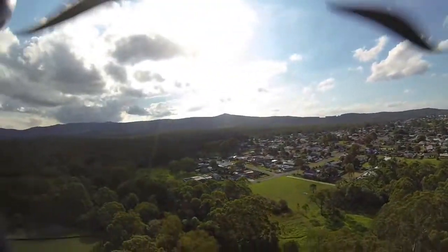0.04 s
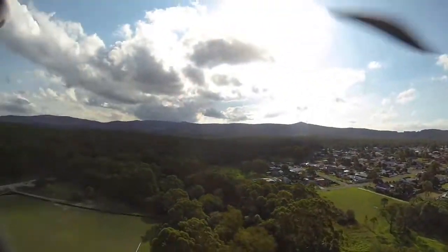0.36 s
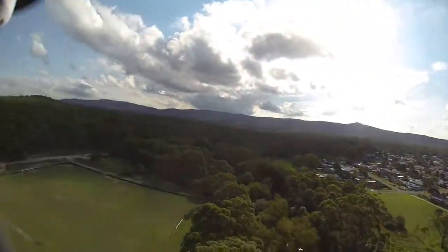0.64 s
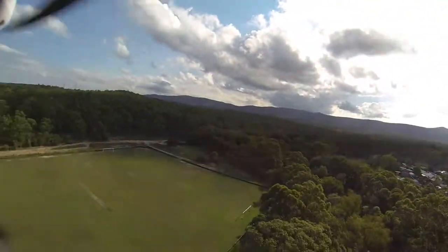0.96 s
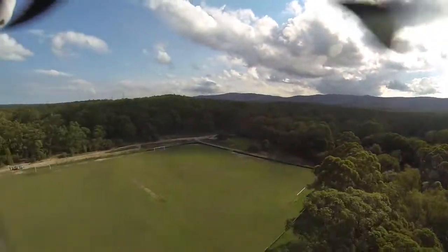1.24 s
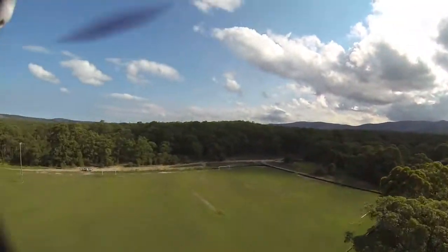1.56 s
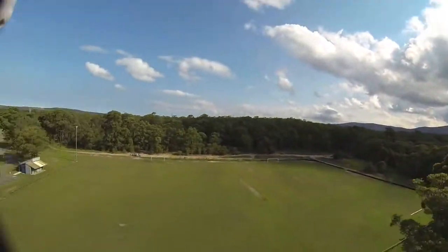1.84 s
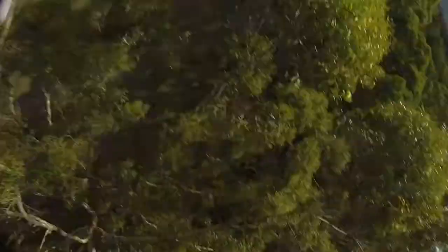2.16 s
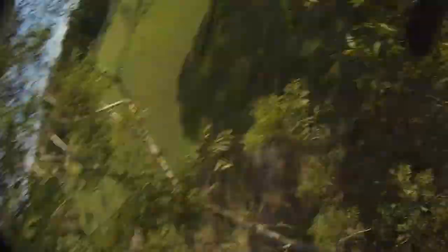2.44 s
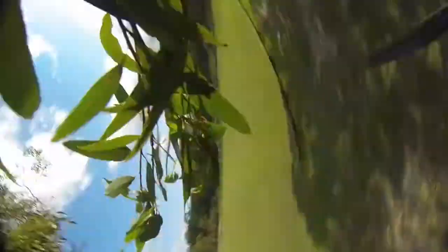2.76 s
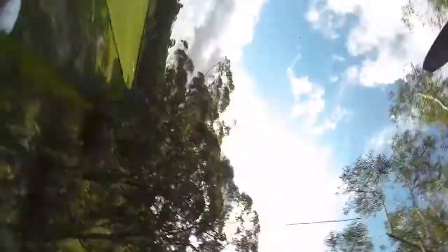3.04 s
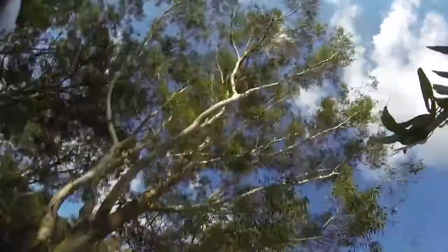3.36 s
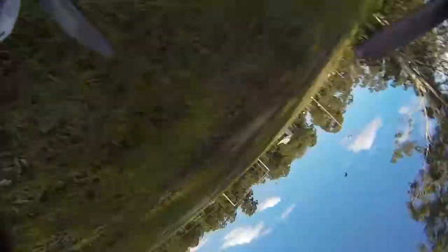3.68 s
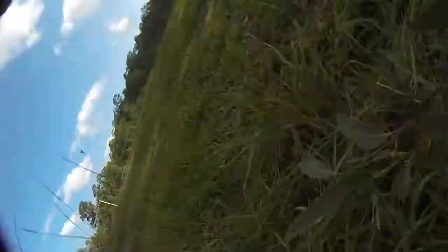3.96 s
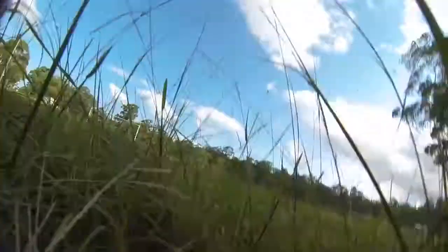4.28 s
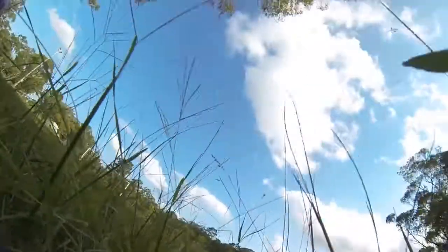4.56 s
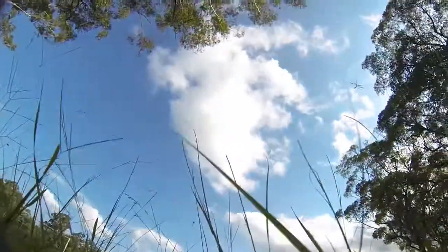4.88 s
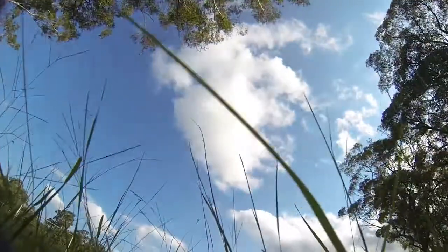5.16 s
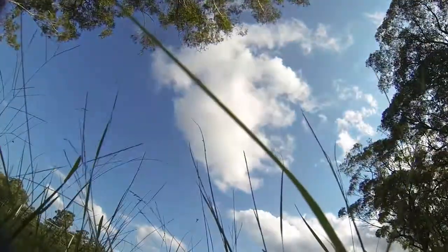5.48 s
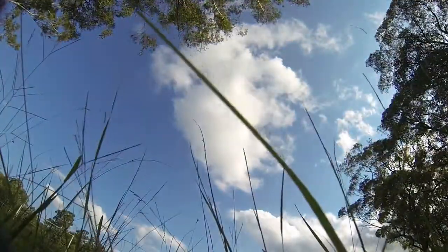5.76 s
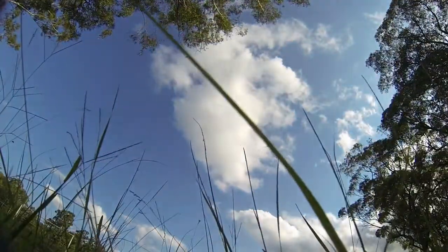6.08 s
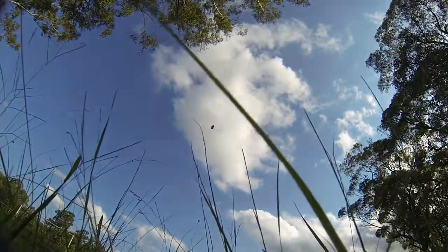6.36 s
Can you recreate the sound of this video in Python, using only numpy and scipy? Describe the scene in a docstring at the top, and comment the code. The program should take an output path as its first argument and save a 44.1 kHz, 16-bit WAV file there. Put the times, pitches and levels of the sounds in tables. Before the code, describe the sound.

A small drone flies outdoors, heard from its own microphone. The propellers buzz in four rising bursts, with a brief motor whine between them and wind buffeting throughout. The blades then stall in a tree, and the drone tumbles through rustling leaves and snapping twigs with dull thumps and gusts. It lands in long grass, which swishes and ticks as it settles over a faint low hum.

```python
"""A tree top over long grass, heard from a camera on a quadcopter. Four bursts of throttle: the blades
slap the microphone with pressure pulses, and the motors whine as they brake in between. The blades stall
in the tree; the drone tumbles through leaves, twigs and rushing air and lands in the grass, where stalks
settle and tick. Gusts and blows make the camera's gain control duck."""
import sys
import numpy as np
from scipy import signal
from scipy.fft import rfft, irfft, next_fast_len
from scipy.io import wavfile
from scipy.ndimage import uniform_filter1d, map_coordinates

SR = 44100
rng = np.random.default_rng(int(sys.argv[2]) if len(sys.argv) > 2 else 0)


def file_out(sig):
    """Save sig as 16-bit WAV at sys.argv[1]."""
    # one column per channel
    cols = np.atleast_2d(sig).T
    # limit, then scale
    lim = np.clip(cols, -1, 1)
    pcm = np.round(lim * 32767).astype(np.int16)
    wavfile.write(sys.argv[1], SR, pcm)


N = 287532
TIME_S = np.arange(N) / SR


# throttle bursts: open t/s, cut t/s, starting blade rate/Hz, target blade rate/Hz, spin-up tau/s,
# slap level/dB, hiss level/dB, trim of the braking sound before the burst/dB
BURSTS = [(0.026, 0.519, 94.25, 180.6, 0.12, -19.5, -30.5, 6),
          (0.601, 1.025, 103.2, 185.4, 0.15, -19, -28.5, 6.5),
          (1.194, 1.696, 96.36, 179, .095, -19.5, -31, 0),
          (1.805, 2.022, 112.9, 223.1, 0.26, -20, -30.5, 1)]

def throttle(braking_s=0.016, run_down_s=0.23):
    """Blades spin up, brake between bursts, then run down; returns blade rate, braking 0-1, gains."""
    t = TIME_S
    blade_hz, driven = np.zeros(N), np.zeros(N, bool)
    last_cut, last_hz = 0, BURSTS[0][2]
    for start, cut, from_hz, target_hz, spin_up_s, *_ in BURSTS:
        off, on = (t >= last_cut) & (t < start), (t >= start) & (t < cut)
        blade_hz[off] = from_hz + (last_hz - from_hz) * np.exp((last_cut - t[off]) / braking_s)
        blade_hz[on] = target_hz - (target_hz - from_hz) * np.exp((start - t[on]) / spin_up_s)
        driven |= on
        last_cut, last_hz = cut, blade_hz[on][-1]
    blade_hz[t >= last_cut] = last_hz * np.exp((last_cut - t[t >= last_cut]) / run_down_s)
    brake = uniform_filter1d(1.0 * (~driven & (t < last_cut)), size=600)
    burst_index = np.searchsorted([row[1] for row in BURSTS[:-1]], t)
    return blade_hz, brake, amp(np.array(BURSTS)[burst_index, -3:].T)


# blade slap and slipstream spectra: f/Hz, relative level/dB
SLAP_SPECTRUM = [(60, 19), (170, 6.5), (360, 6.5), (540, 2.4), (720, -5), (920, -12), (1400, -11.5),
                 (1750, -14.5), (2400, -23), (5000, -41)]
HISS_SPECTRUM = [(600, -24), (2200, 6.5), (5000, 1), (9000, -2), (13500, -1.5), (16000, -6.5)]

def propellers(blade_hz, brake, slap_gain, hiss_gain):
    """Each passing blade throws a pressure pulse; returns the sound and the wash's gain on the eddies."""
    far_ratio, far_db = 0.94, -11  # second, more distant rotor
    edge_hz, stall_s = 280, (1.96, 2.0)
    speed = blade_hz / blade_hz.max()
    jitter = (0.002 + 0.04 * brake) * wobble(70)
    cycles = np.cumsum(blade_hz * (1 + jitter)) / SR
    near = np.diff(np.floor(cycles), prepend=0) * amp(1.1 * wobble(170))
    far = np.diff(np.floor(far_ratio * cycles + 0.291 * wobble(6)), prepend=0)
    pulses = colour(near + amp(far_db) * far, SLAP_SPECTRUM)
    pulses = unit(pulses - uniform_filter1d(pulses, size=1500))
    # slow blade: soft push; fast blade: sharp edge
    push = signal.lfilter(*signal.butter(1, edge_hz, fs=SR), pulses)
    edge = pulses - push
    # stall in the leaves: the slap gives way to a falling throb
    running = np.interp(TIME_S, stall_s, [1, 0])
    slap = running * slap_gain * amp(-1.5 * brake) * (speed ** 0.46 * push + speed ** 1.72 * edge)
    throb = swell(peak_s=2.105, rise_s=0.055, fall_s=0.065, db=-16.5) * np.sin(2 * np.pi * cycles)
    # air is roughest just behind each blade
    beat = 0.49 + np.exp(-(cycles % 1) / 0.14)
    beat /= np.sqrt(np.average(beat ** 2, weights=running))
    slipstream = running * hiss_gain * speed ** 3.7 * noise(HISS_SPECTRUM) * beat
    wash = amp(6 - 3.5 * brake) * speed ** 0.18 * beat
    return slap + throb + slipstream, 1 + running * (wash - 1)


# motor whine: harmonic number, relative level/dB
WHINE_HARMONICS = [(1, -10), (2, -17), (3, -16), (5, -23), (7, -15.5), (9, -15)]

def motor_braking(effort, whine_hz=1147):
    """Braking motors sizzle and whine at one slightly rough pitch."""
    phase = 2 * np.pi * np.cumsum(whine_hz * (1 + 0.016 * wobble(600))) / SR
    whine = sum(amp(db) * np.sin(k * phase) for k, db in WHINE_HARMONICS) * amp(1.5 * wobble(120))
    sizzle = uniform_filter1d(effort, size=2800) * noise(HISS_SPECTRUM)
    return amp(-31) * effort * whine + amp(-38) * sizzle


# airflow in flight, in the tree, falling and bouncing: t/s, relative level/dB
AIRFLOW = [(0, 0), (1.96, -.5), (2.0, -4.5), (2.13, -0.5), (2.19, 3.5), (2.33, -8.5), (2.74, -9.5),
           (2.83, -3), (3.25, 0), (3.62, 0.5), (3.7, -9), (3.96, -31.5), (4.16, -6.5), (4.42, -30.5)]
# gusts as the body swings: peak t/s, half length/s, flutter level/dB, eddy level/dB
GUSTS = [(0.027, 0.0037, -19, -19.5), (0.052, 0.1, -20.5, -22.5), (1.107, 0.085, -16, -20),
         (1.193, 0.0072, -21, -21.5), (1.271, 0.043, -17.5, -38), (1.875, 0.044, -12, -22.5),
         (2.208, 0.013, -12.5, -28.5), (2.251, 0.024, -17.5, -21.5), (2.405, 0.04, -28, -35.5),
         (2.031, 0.024, -23, -30), (2.611, 0.027, -28, -29.5), (2.797, 0.014, -14.5, -20.5),
         (2.994, 0.068, -16.5, -33.5), (2.996, 0.0043, -30, -27), (3.146, 0.058, -11, -55),
         (3.268, 0.06, -27, -26), (3.389, 0.035, -22, -28.5), (3.475, 0.014, -12.5, -27),
         (3.637, 0.0076, -12.5, -32), (4.204, 0.031, -48, -38.5)]
# turbulence spectra, large lumps to small: f/Hz, relative level/dB
BUFFET_SPECTRUM = [(8, 5), (30, 5.5), (100, -3.5), (200, -27), (1000, -78.5)]
FLUTTER_SPECTRUM = [(60, -2), (140, 4), (260, -2), (450, -10.5), (800, -24), (2000, -49.5)]
EDDY_SPECTRUM = [(200, -4), (550, 7.5), (1200, 2.5), (2000, -6.5), (3500, -17), (8000, -43.5)]

def rushing_air(wash):
    """Air tears past the camera in lumps, with gusts on top; the blades chop the smallest lumps."""
    flow_db = curve(AIRFLOW)
    gust_flutter = sum(swell(s, half_s, half_s, db) for s, half_s, db, _ in GUSTS)
    gust_eddies = sum(swell(s, half_s, half_s, db) for s, half_s, _, db in GUSTS)
    lumps_db = 5 * np.tanh(wobble(45))
    buffet = noise(BUFFET_SPECTRUM)
    flutter = unit(noise(FLUTTER_SPECTRUM) * amp(lumps_db))
    eddies = unit(noise(EDDY_SPECTRUM) * amp(0.49 * lumps_db + 6.5 * np.tanh(wobble(260))))
    return (buffet * np.hypot(amp(-20 + flow_db), amp(-2.5) * gust_flutter)
            + flutter * np.hypot(amp(-21.5 + 1.9 * flow_db), gust_flutter)
            + eddies * np.hypot(amp(-34.5 + 1.5 * flow_db) * wash, gust_eddies))


# pressure jolts: t/s, peak level/dB, rise/s
JOLTS = [(0.026, 0, 0.00098), (1.003, 4.5, 0.00097), (1.679, 4, 0.00054), (2.219, 9.5, 0.0006),
         (2.311, 6.5, 0.000093), (3.405, 9.5, 0.00055)]

def jolts(fall_s=0.0012):
    """Single heavy pushes of pressure on the microphone, gone in milliseconds."""
    out, t = np.zeros(N), np.arange(-SR // 50, SR // 50) / SR
    for s, db, rise_s in JOLTS:
        add(out, s + t[0], amp(db) * np.exp(-np.abs(t) / np.where(t < 0, rise_s, fall_s)))
    return out


# body against boughs and ground: t/s, level/dB, f/Hz, t60/s
THUMPS = [(2.385, -1.5, 12, 0.2), (2.674, -11.5, 18.9, 0.75), (2.802, 1, 26, 0.17), (4.153, -18, 34, 0.58)]

def thumps(rise_s=0.003):
    """The whole body stops short and rocks briefly."""
    out, t = np.zeros(N), np.arange(SR // 2) / SR
    for s, db, hz, t60 in THUMPS:
        add(out, s, amp(db - 60 * t / t60) * np.sin(2 * np.pi * hz * t) * (1 - np.exp(-t / rise_s)))
    return out


# branches, twigs and stalks hitting the frame: t/s, relative level/dB, knock trim/dB, f/Hz, t60/s
TWIG_HITS = [(1.9733, -12.5, -4.5, 12500, 0.075), (2.4814, -11, -5, 9050, 0.016),
             (2.5165, -8.5, -12.5, 3940, 0.013), (2.5424, -13, -19, 13400, 0.034),
             (2.5493, -9.5, -12, 8000, 0.019), (2.7177, -10.5, -28, 3440, 0.015),
             (2.31, -4, -6, 10600, 0.02), (2.3895, -13, -17, 4100, .022), (2.418, -7, -2, 11980, 0.013),
             (2.97, -18.5, -2, 4110, 0.018), (3.4555, -16.5, -3, 4000, 0.0099),
             (3.5896, -28.5, 0, 6500, 0.08), (3.6465, -3, -7, 11700, 0.035),
             (3.8669, -22.5, -32, 11900, 0.0095), (4.1016, -26, -31, 12200, 0.013),
             (4.155, -7.5, -8.5, 5250, 0.017), (4.199, -16, -26, 6000, 0.014),
             (4.8145, -22.5, -27, 12370, .006), (4.864, -24.5, -28, 7100, 0.017),
             (5.0884, -35.5, -28, 12000, 0.053), (5.332, -20.5, -11, 14400, 0.0082),
             (5.3395, -28, -22, 13600, 0.0067), (5.411, -30.5, -28, 12500, 0.074),
             (5.737, -29, -30, 12900, 0.0089), (5.7821, -21.5, -19, 12100, 0.037),
             (5.941, -15, -25, 4470, 0.0079), (6.029, -37, -29.5, 5000, 0.032)]
# spectra of a hit's two parts: f/Hz, relative level/dB
CRACK_SPECTRUM = [(700, -39), (2000, -7), (4000, -1.5), (8000, 0), (12500, 3)]
KNOCK_SPECTRUM = [(80, 12.5), (1200, 1.5), (2500, -6.5), (5000, -12.5), (10000, -51)]

def snaps(rise_s=0.00028, ring_db=5.5):
    """Each twig or stalk gives a bright crack, ringing at its own pitch, and a duller knock."""
    cracks, knocks, t = np.zeros(N), np.zeros(N), np.arange(SR // 5) / SR
    for s, db, knock_db, hz, t60 in TWIG_HITS + stalk_flicks():
        envelope = amp(db - 60 * t / t60) * (1 - np.exp(-t / rise_s))
        crack, knock = rng.standard_normal((2, len(t))) * envelope
        ring = signal.lfilter(*signal.iirpeak(hz, Q=3.5, fs=SR), crack)
        add(cracks, s, crack + amp(ring_db) * ring)
        add(knocks, s, amp(knock_db) * knock)
    return amp(-6.5) * colour(cracks, CRACK_SPECTRUM) + amp(0.5) * colour(knocks, KNOCK_SPECTRUM)


def stalk_flicks(start_s=3.72, span_s=1.33, per_s=20, centre_hz=3600):
    """Bent stalks slip free at random after the landing; returns rows like TWIG_HITS."""
    draws = rng.random((round(per_s * span_s), 3))
    return [(start_s + when * span_s, -33.5 + 10 * size, -12, centre_hz * 2 ** (2 * pitch - 1), 0.008)
            for when, pitch, size in draws]


# leaves dragged over the body: start t/s, hold/s, release/s, level/dB
LEAF_STROKES = [(1.963, 0.026, 0.048, -27), (2.038, 0.181, .01, -41), (2.226, 0.12, 0.033, -46.5),
                (2.391, 0.12, 0.028, -26.5), (2.56, 0.03, 0.082, -48), (2.675, 0.24, 0.018, -47),
                (2.894, 0.21, 0.052, -38.5), (3.2, 0.26, 0.011, -46), (3.498, 0.15, 0.045, -43),
                (3.626, 0.031, 0.016, -25)]
# grass swept aside, then springing back: peak t/s, rise/s, fall/s, level/dB
GRASS_SWISHES = [(3.84, 0.14, 0.062, -41.5), (4.162, 0.055, 0.075, -23), (4.64, 0.4, 0.21, -34.5),
                 (5.012, 0.022, 0.015, -40.5), (5.09, 0.03, 0.055, -48.5), (5.42, 0.04, 0.026, -52),
                 (5.5, 0.049, 0.067, -48.5), (5.6, 0.012, 0.043, -47.5), (5.83, 0.067, 0.11, -49.5)]
# rubbing spectra: f/Hz, relative level/dB
LEAF_SPECTRUM = [(400, -28), (1500, -12.5), (4000, -7.5), (7000, -11.5), (12500, -5.5), (16000, -10)]
GRASS_SPECTRUM = [(200, -54), (650, -15.5), (1000, -7.5), (2100, -6.5), (4000, -6.5), (6500, -7.5),
                  (13000, -0.5), (16000, -4.5)]

def foliage(ring_db=-6):
    """Leaves, then grass, drag over the body and excite the frame's modes."""
    brushing = np.linalg.norm([stroke(*row) for row in LEAF_STROKES], axis=0)
    swishing = np.linalg.norm([swell(*row) for row in GRASS_SWISHES], axis=0)
    leaves = crackle(LEAF_SPECTRUM, per_s=280, spread_db=2.4, share=0.6, patchy_db=2.5) * amp(wobble(50))
    grass = crackle(GRASS_SPECTRUM, per_s=1000, spread_db=2.6, share=0.85, patchy_db=2.4)
    rubbing = brushing * leaves + swishing * grass
    modes = [signal.iirpeak(hz, Q=np.pi * hz * t60 / np.log(1000), fs=SR) for hz, _, t60 in FRAME_MODES]
    return rubbing + amp(ring_db) * sum(signal.lfilter(b, a, rubbing) for b, a in modes)


def crackle(spectrum, per_s, spread_db, share, patchy_db, contact_s=0.0006):
    """Tiny uneven contacts carry a share of the power, a smooth swish the rest; rms 1."""
    sizes = amp(spread_db * np.minimum(rng.exponential(size=N), 4))
    contacts = (rng.random(N) < per_s / SR) * sizes
    power = signal.lfilter([1], [1, -np.exp(-1 / (contact_s * SR))], contacts ** 2)
    envelope = np.sqrt(1 - share + share * power / power.mean())
    bins = signal.stft(rng.standard_normal(N) * envelope, nperseg=512)[2]
    # each leaf favours its own pitches for a moment
    patches = uniform_filter1d(rng.standard_normal(bins.shape), size=4, axis=0)
    patches = unit(uniform_filter1d(patches, size=5, axis=1))
    rustle = signal.istft(bins * amp(patchy_db * patches))[1][:N]
    return unit(colour(rustle, spectrum))


# frame modes: f/Hz, relative level/dB, t60/s
FRAME_MODES = [(1712, -3, .25), (2100, -16, .02), (4020, -10, .09), (6500, -15, .06), (8100, 0, .04),
               (10400, -18, .02), (12400, -16, .02)]
# bumps against branches: t/s, level/dB
BRANCH_BUMPS = [(2.31, -26), (2.903, -30), (3.076, -35)]

def frame_ring():
    """The stiff frame pings on a branch, its modes balanced differently each time."""
    out, t = np.zeros(N), np.arange(SR // 2) / SR
    for s, db in BRANCH_BUMPS:
        for hz, mode_db, t60 in FRAME_MODES:
            envelope = amp(db + mode_db + rng.normal(0, 2) - 60 * t / t60)
            add(out, s, envelope * np.sin(2 * np.pi * hz * t))
    return out


# low hum: t/s, level/dB
HUM_LEVELS = [(3.9, -56), (4.1, -51), (4.95, -40.5), (5.4, -55), (5.9, -39), (6.4, -44.5)]
# outdoor rumble: f/Hz, relative level/dB
RUMBLE_SPECTRUM = [(15, 2.5), (200, -12), (400, -19.5), (1000, -31), (3000, -43), (8000, -45), (14000, -42)]

def outdoors(hum_hz=107.7, rumble_db=-42.5):
    """Faint rumble and a hum that swells and fades, heard once the drone lies still."""
    humming = (TIME_S >= HUM_LEVELS[0][0]) & (TIME_S <= HUM_LEVELS[-1][0])
    hum_rms = uniform_filter1d(1.0 * humming, size=400) * amp(curve(HUM_LEVELS))
    hum = hum_rms * np.sqrt(2) * np.sin(2 * np.pi * hum_hz * TIME_S + 0.067 * wobble(4))
    settled = np.interp(TIME_S, (4, 4.8), (0.3, 1))
    return hum + settled * amp(rumble_db) * noise(RUMBLE_SPECTRUM)


def amp(db):
    """Decibels to gain."""
    return 10 ** (np.asarray(db) / 20)


def unit(x):
    """Scale to rms 1."""
    return x / np.sqrt(np.mean(x ** 2) + 1e-20)


def curve(rows):
    """One value per sample from (t/s, value) rows."""
    return np.interp(TIME_S, *np.transpose(rows))


def wobble(knots_per_s):
    """Smooth random curve."""
    knots = rng.standard_normal(int(N * knots_per_s / SR) + 4)
    return map_coordinates(knots, [TIME_S * knots_per_s])


def swell(peak_s, rise_s, fall_s, db):
    """Gain that rises and falls, its peak between a cusp and a bell."""
    age = TIME_S - peak_s
    return amp(db) * np.exp(-np.abs(age / np.where(age < 0, rise_s, fall_s)) ** 1.5)


def stroke(start_s, hold_s, release_s, db, attack_s=0.0092):
    """Gain with attack, hold and release."""
    age = TIME_S - start_s
    return amp(db) * np.clip(age / attack_s, 0, 1) * np.exp(-np.maximum(age - hold_s, 0) / release_s)


def colour(x, spectrum):
    """Minimum-phase filter from (f/Hz, level/dB) rows; white noise keeps its power."""
    size = 2 * next_fast_len(N // 2 + SR // 4)
    hz, db = np.transpose(spectrum)
    gain = unit(amp(np.interp(np.log(np.fft.rfftfreq(size, 1 / SR) + 1), np.log(hz), db)))
    cepstrum = irfft(np.log(gain))
    cepstrum[1:size // 2] *= 2
    cepstrum[size // 2 + 1:] = 0
    return irfft(rfft(x, size) * np.exp(rfft(cepstrum)))[:N]


def noise(spectrum):
    """Coloured noise, rms 1."""
    return unit(colour(rng.standard_normal(N), spectrum))


def add(track, s, sound):
    """Mix a sound into a track at time s."""
    start = max(round(s * SR), 0)
    track[start:start + len(sound)] += sound[:N - start]


def scene():
    """Everything as heard on board, mono."""
    blade_hz, brake, (slap_gain, hiss_gain, brake_gain) = throttle()
    buzz, wash = propellers(blade_hz, brake, slap_gain, hiss_gain)
    flight = buzz + motor_braking(brake * brake_gain) + rushing_air(wash) + jolts()
    crash = thumps() + foliage() + snaps() + frame_ring()
    return (flight + crash + outdoors())[None]


# drift of the camera's zero line: t/s, offset/full scale
DC_OFFSET = [(4.1, .04), (5.05, .21)]

def record(dry, ceiling=0.88, recovery_db_per_s=110, top_hz=15300):
    """Gain drops at once on overload and climbs back steadily; the top is cut; the zero line drifts."""
    overload_db = 20 * np.log10(np.maximum(np.abs(dry) / ceiling, 1))
    recovery_db = recovery_db_per_s * TIME_S
    duck_db = np.maximum.accumulate(overload_db + recovery_db, axis=-1) - recovery_db
    low_pass = signal.ellip(12, 0.1, 90, top_hz, fs=SR, output="sos")
    return signal.sosfilt(low_pass, dry * amp(-duck_db)) + curve(DC_OFFSET)


dry = scene()
out = record(dry)
file_out(out)
```